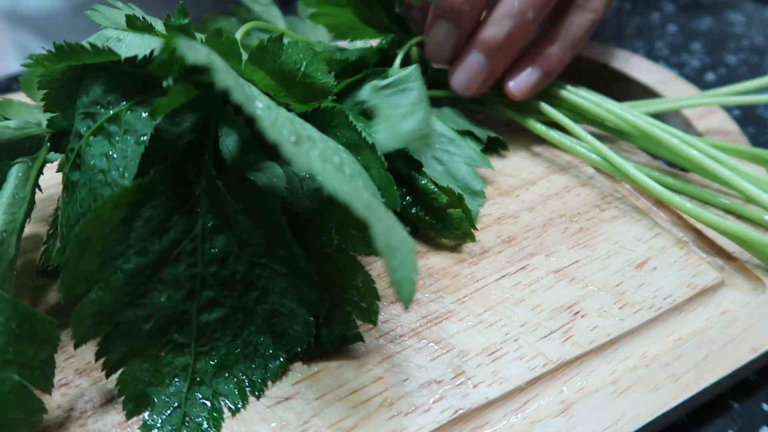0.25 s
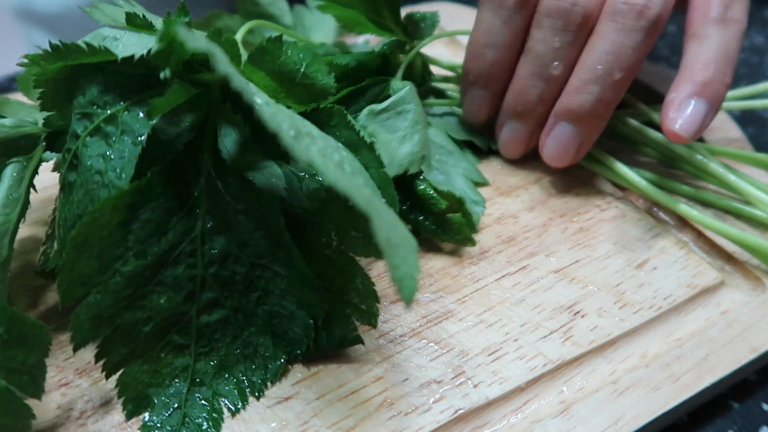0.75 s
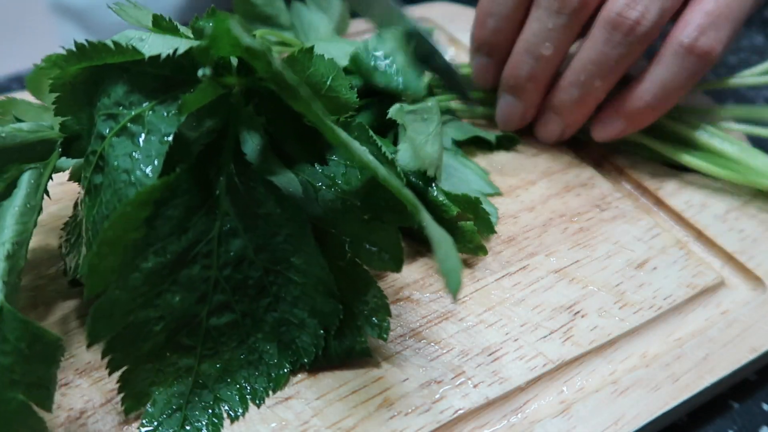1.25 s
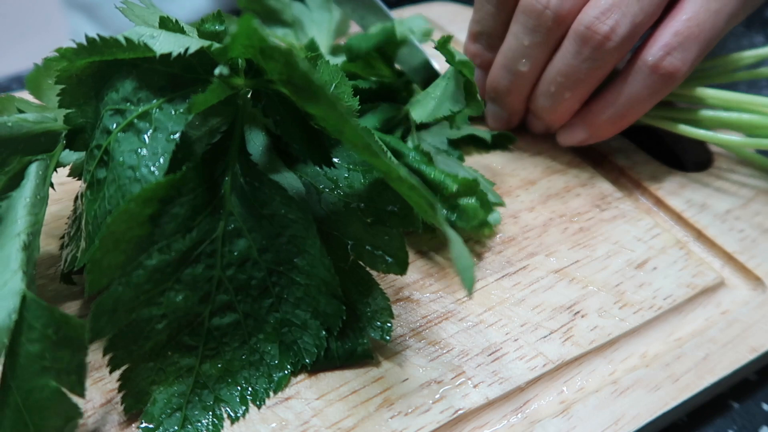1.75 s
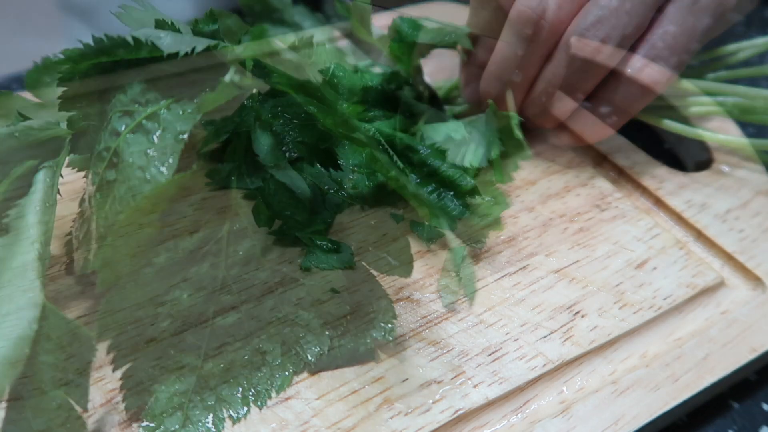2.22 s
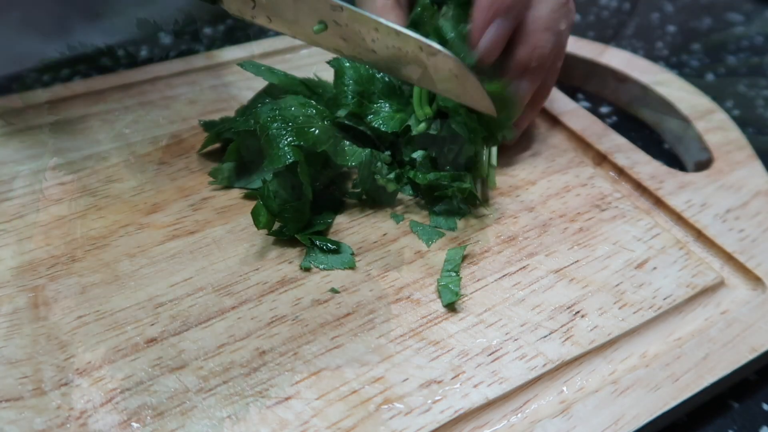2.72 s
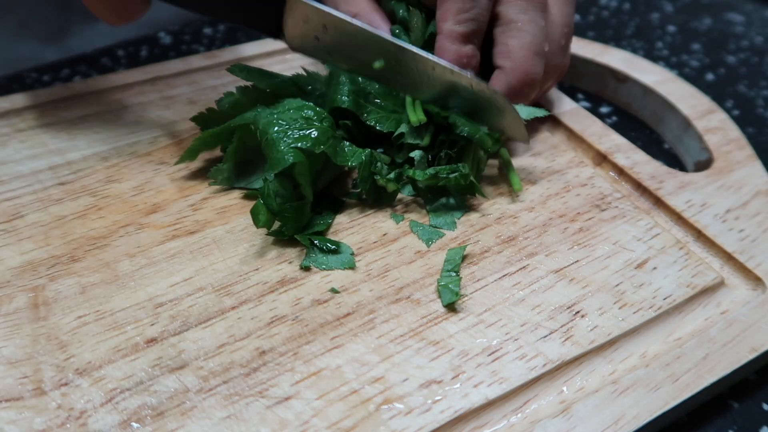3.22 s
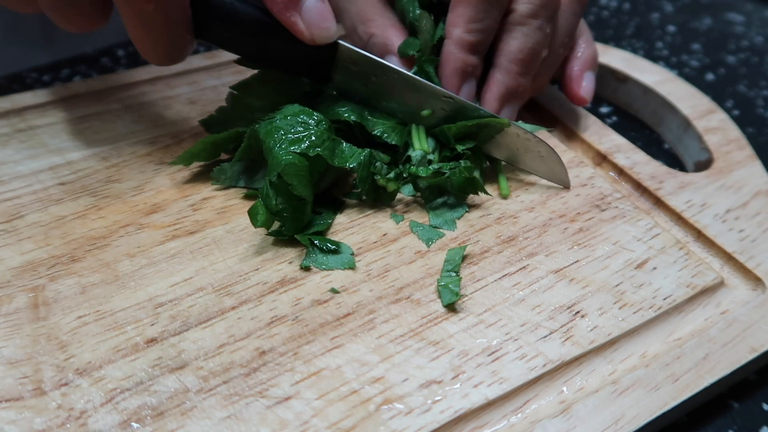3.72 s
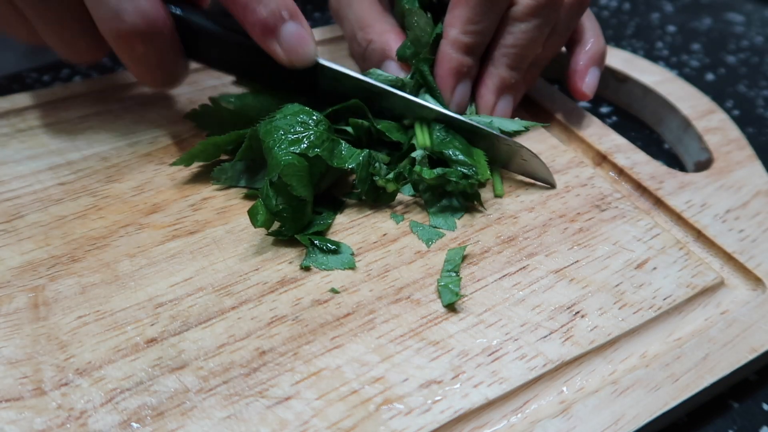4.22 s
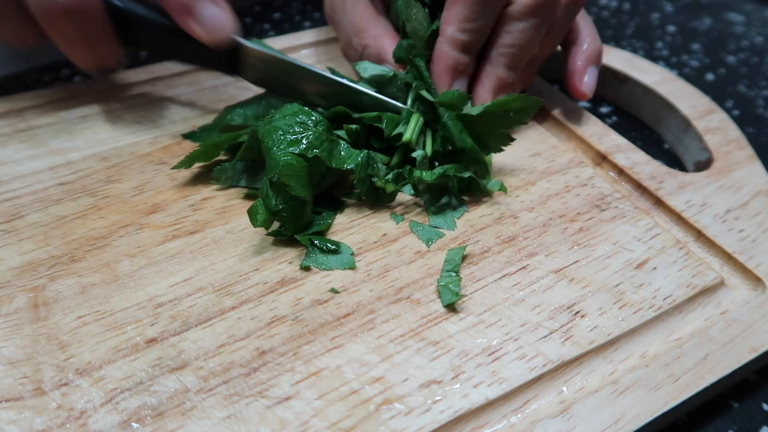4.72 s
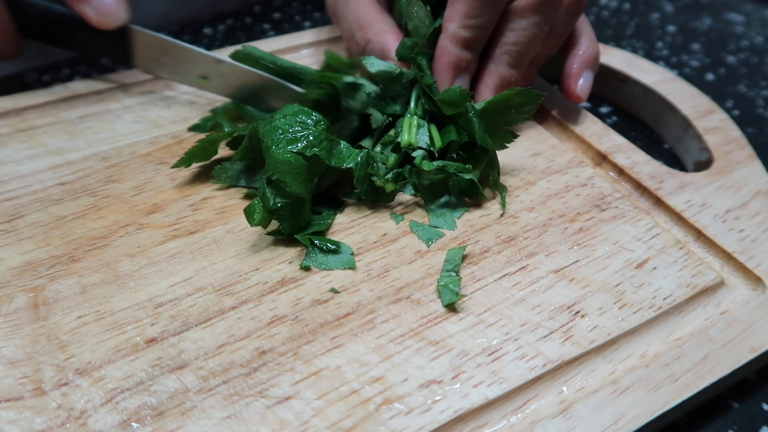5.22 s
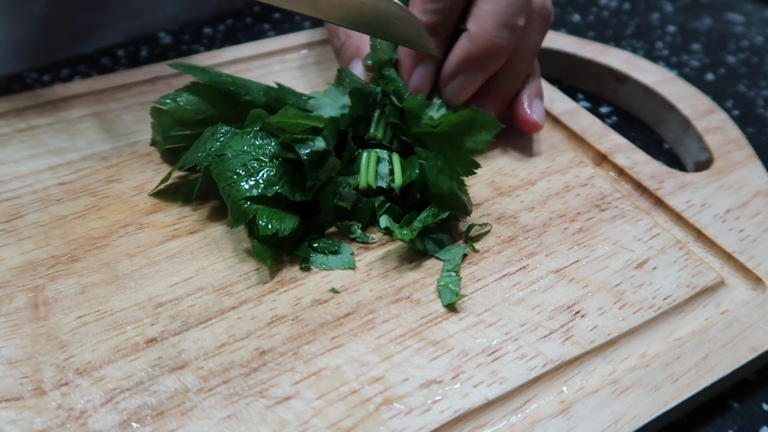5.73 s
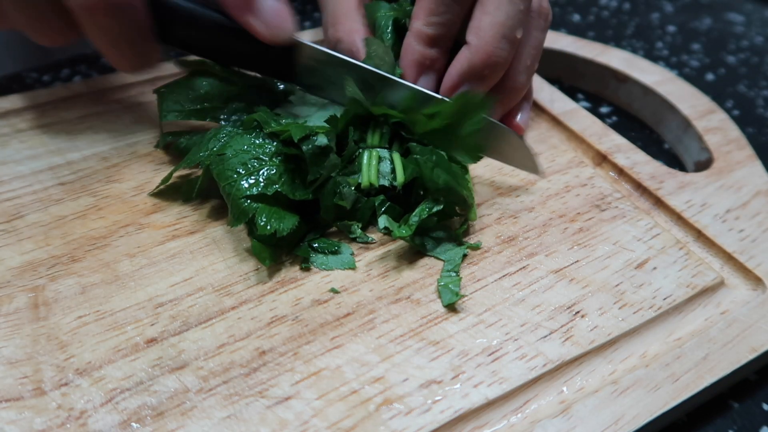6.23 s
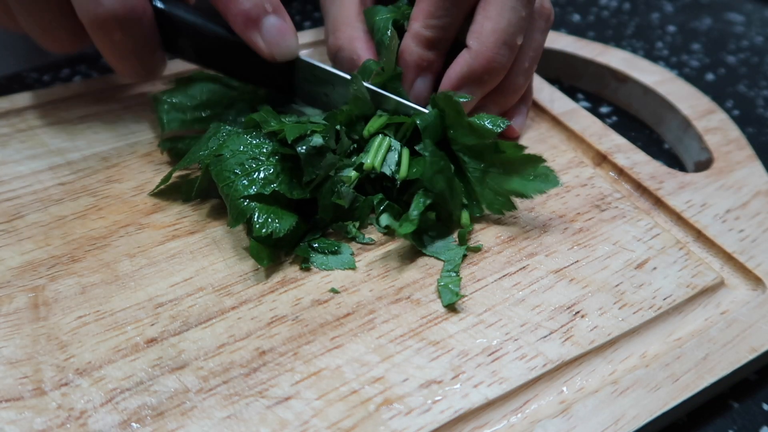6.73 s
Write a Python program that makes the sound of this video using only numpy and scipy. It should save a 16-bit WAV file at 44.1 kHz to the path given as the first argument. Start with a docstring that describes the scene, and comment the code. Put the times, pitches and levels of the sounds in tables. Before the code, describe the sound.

A closely heard knife works through leafy herbs on a wooden cutting board. Quiet handling and faint stalk cracks come first, followed by light taps and scattered snaps. Five quick, juicy crunches then knock the board, the last with the sharpest crack. After a lull of rustling and finger rubs, two more crunchy strokes close the scene. A low, fluctuating hum continues throughout in a fairly dry kitchen.

```python
"""A small knife cuts leafy herbs on a wooden board, close by, in a humming kitchen.
Each stroke is a crunch of dense random fractures, with snapping stalks as short swinging pulses
and knocks as decaying board modes. Leaves rustle under a hand as crackles that swell and fade,
fingers and blade rub over them, and a wet stalk squeaks faintly near the start.
The hum is shaped noise with a mains tone, its level rising and falling; short scatter and
decaying tails give the echoes."""
import sys
import numpy as np
from scipy import signal
from scipy.fft import rfft, irfft, next_fast_len
from scipy.io import wavfile
from scipy.ndimage import uniform_filter1d, map_coordinates

SR = 44100
rng = np.random.default_rng(int(sys.argv[2]) if len(sys.argv) > 2 else 0)


def unload_wav(signal):
    """Save mono or channel-first audio to the path in sys.argv[1] as 16-bit WAV at rate SR, clipped to [-1, 1]."""
    wavfile.write(
        sys.argv[1],
        SR,
        np.round(np.clip(np.atleast_2d(signal).T, -1, 1) * 32767).astype(np.int16),
    )


N = 306936

# Spectra hold relative levels; event levels are those before the gain of their layer.
# level curve of the hum: time_s, level_db
HUM_LEVEL = [(0.0, -48), (0.3, -50), (0.5, -54.5), (0.85, -56.5), (1.27, -52), (1.75, -60.5), (2.0, -52.5),
             (2.48, -62), (3.0, -52.5), (3.5, -51.5), (4.1, -48.5), (4.8, -46), (5.3, -47), (6.15, -50),
             (6.5, -45.5), (6.96, -45)]
# spectrum of the low drone: frequency_hz, density_db (per Hz)
DRONE_SPECTRUM = [(25, -58), (33, -42), (46, -12), (60, -13), (78, -20.5), (98, -2), (125, -4), (160, -4),
                  (200, -3), (245, -4), (285, -19), (350, -18.5), (430, -21), (650, -16), (1100, -120)]
# spectrum of the soft rush of air: frequency_hz, density_db (per Hz)
AIR_SPECTRUM = [(150, -4.5), (330, 7.5), (600, 0), (1250, -2.5), (1600, -11), (2700, -14), (4000, -21.5),
                (8000, -32), (15000, -46)]
# likeness of the hum in the two ears: frequency_hz, correlation (0 to 1)
HUM_LIKENESS = [(130, 1), (220, 0.97), (330, 0.42), (600, 0.64), (1400, 0.46), (3100, 0.0031), (6800, 0)]
# decay of the kitchen's reverberation: frequency_hz, t60_s
KITCHEN_DECAY = [(150, 0.2), (600, 0.29), (2500, 0.048), (6000, 1), (14000, 0.33)]
# left-right difference of the near scatter: frequency_hz, side_db
SCATTER_SPREAD = [(100, -17), (200, -19), (380, -20), (700, -35), (1300, -32), (2400, -13), (4400, -5),
                  (8000, 3), (15000, 0)]
# spectrum of creasing leaves: frequency_hz, density_db (per Hz)
LEAF_SPECTRUM = [(200, -15.5), (550, 13.5), (900, 2.5), (1400, 8.5), (1900, -2.5), (2500, 6), (3300, -1),
                 (4300, -5), (5600, -4.5), (7500, -11), (12500, -12.5), (15500, -23)]
# duller spectrum of settling and rubbed leaves: frequency_hz, density_db (per Hz)
SKIN_SPECTRUM = [(250, -15), (600, 5.5), (1300, 9), (1900, 0.5), (2600, 5.5), (3500, -4), (4400, -8),
                 (5700, -9.5), (8000, -16), (15000, -27.5)]
# spectrum of bursting stalks: frequency_hz, density_db (per Hz)
STALK_SPECTRUM = [(100, -5), (220, 6), (400, 5.5), (580, 4.5), (900, -9), (1350, -0.5), (1950, 1),
                  (2500, 3.5), (3300, -0.5), (4300, -6.5), (5600, -7), (7500, -14.5), (12500, -12.5),
                  (15500, -22)]
# spectrum of a stalk's sharp crack: frequency_hz, density_db (per Hz)
CRACK_SPECTRUM = [(300, -31), (1200, -38), (2500, 22.5), (3500, 5), (6000, 5), (8000, -19.5), (12500, -2.5),
                  (15500, -12)]
# spectrum of the counter under the board: frequency_hz, density_db (per Hz)
COUNTER_SPECTRUM = [(30, -29), (60, -3), (150, -12), (300, -4.5), (450, 1.5), (700, -21), (1500, -66)]
# modes of the board: frequency_hz, level_db, t60_s
BOARD_MODES = [(534, -9, 0.061), (585, 0.5, 0.077), (770, -2, 0.029), (914, -7.5, 0.046),
               (1000, -4.5, 0.02), (1228, -13, 0.083), (1522, -5, 0.036), (1823, -28, 0.05),
               (3030, -33, 0.055)]
# modes of the thin blade, damped by the hand and the leaves: frequency_hz, t60_s, level_db
BLADE_MODES = [(1248, 0.1, -11.5), (1520, 0.006, 6), (1925, 0.03, -9.5), (2405, 0.027, 0.5),
               (2470, .01, 1.5), (2724, 0.016, -8), (3140, 0.0031, 4.5), (3780, 0.0044, 0.5),
               (4980, 0.018, -18.5), (5560, 0.0028, -13)]
# the hand gathers or presses the leaves: fullest_s, rise_s, fall_s, level_db,
# crispness_db (popping relative to the rustle)
HANDLINGS = [(0.01, 0.062, 0.18, -63.5, 5), (1.16, 0.24, 0.2, -70, 3), (2.075, 0.2, 0.25, -52, -4),
             (2.22, 0.13, 0.43, -61, 0.5), (2.95, 0.23, 0.16, -67.5, 2), (3.27, 0.11, 0.42, -68.5, -7),
             (3.66, 0.18, 0.18, -56.5, -9), (3.94, 0.35, 0.15, -58, 1), (5.31, 0.094, 0.52, -59.5, 3.5),
             (5.63, 0.24, 0.27, -77, 10), (6.16, 0.76, 0.83, -63, -6), (6.335, 0.2, 0.068, -49.5, -3),
             (6.455, 0.093, 0.067, -48, 4)]
# fingers slide over the bunch: start_s, length_s, level_db, crackle_pitch_hz
RUBS = [(1.522, 0.033, -66, 2200), (2.467, 0.061, -72, 2740), (2.937, 0.038, -63, 2900),
        (3.563, 0.15, -66, 2500), (5.002, 0.03, -47, 2400), (5.057, 0.075, -52, 2410),
        (5.241, 0.048, -54.5, 2400), (5.275, 0.074, -53.5, 1150), (5.549, 0.16, -56, 2700),
        (5.921, 0.07, -55, 1640), (6.257, 0.067, -55, 3560), (6.302, 0.052, -54, 2720),
        (6.668, 0.059, -48.5, 2300)]
# the blade touches the board lightly: time_s, knock_db, low_thump_db (relative to the knock)
TAPS = [(2.138, -45.5, -16), (3.090, -43.5, -10), (3.718, -46, -14), (4.281, -35, -24), (6.682, -32.5, -16)]
# single stalks and ribs break: start_s, peak_db, pitch_hz, cycles (to the fullest swing), sharpness_db
SNAPS = [(1.151, -43.5, 1700, 1.25, -34), (1.2096, -50, 3300, 1.1, -31), (1.314, -44.5, 2000, 2.2, -34),
         (1.3146, -52, 3530, 2.9, -36), (1.708, -57, 2400, 1.2, -26), (1.839, -46, 2450, 1, -27),
         (1.850, -45, 2000, 0.58, -29), (1.8827, -39.5, 1610, 1.2, -24), (1.8953, -41, 1520, 1.3, -19),
         (1.95, -49, 2000, 1, -16), (2.029, -46, 2780, 0.8, -18), (2.041, -30, 1550, 0.62, -18),
         (2.0625, -39, 1990, .7, -22), (2.0755, -41, 1800, 0.52, -24), (2.0868, -36, 2500, 1, -15),
         (2.103, -34.5, 1700, 0.74, -17), (2.137, -32.5, 1700, 0.95, -22), (2.1478, -36, 1640, 0.99, -27),
         (2.1873, -38.5, 1820, 0.94, -23), (2.238, -44, 1890, 1.6, -28), (2.255, -43, 1900, 0.96, -22),
         (2.29, -40, 1430, 1.16, -18), (2.3265, -42, 2620, 1.03, -9.5), (2.376, -43, 1500, 0.61, -29),
         (2.4673, -40, 1490, 0.86, -20.5), (2.407, -53, 2000, .9, -24), (2.528, -50, 2600, 0.99, -30),
         (2.543, -46.5, 2420, 1, -32), (2.598, -56, 2600, 1, -24), (2.690, -57, 2600, 0.87, -24),
         (2.8892, -34, 2470, 2.25, -27), (2.9837, -33.5, 2000, 0.94, -17.5), (3.475, -51, 2600, 1.1, -16),
         (3.503, -45, 2600, 1, -20), (3.5877, -38, 2000, 0.7, -17.5), (3.6, -43, 2400, 1.4, -24),
         (3.617, -48, 2400, 0.63, -11), (3.713, -42.5, 2200, 0.78, -24), (3.6642, -40.5, 1200, 1.2, -15),
         (3.7448, -34.5, 3200, 0.75, -23), (3.7984, -39, 2530, 1.4, -14), (3.828, -45, 2500, 0.67, -20),
         (3.854, -43, 1460, 1.3, -26), (3.950, -34.5, 2450, 1, -23), (4.0166, -27.5, 2550, 1.2, -20),
         (4.045, -31.5, 1390, 1.1, -9.5), (4.089, -27.5, 1400, 0.6, -17.5), (4.175, -33, 2450, 1.4, -13),
         (4.2392, -31, 1750, .9, -17), (4.247, -27, 1740, 1.14, -27), (4.2544, -24, 1790, 0.9, -20),
         (4.2628, -27, 2350, 1.5, -13), (4.2733, -25, 1460, 1.04, -15.5), (4.2872, -34, 1480, 0.61, -17),
         (4.4734, -35, 2600, 0.97, -25), (4.4811, -19.5, 1440, 1.5, -14.5), (4.4934, -29, 1280, 2.1, -24),
         (4.5046, -21.5, 2550, 1.9, -16), (4.5095, -28, 1540, 1.7, -16), (4.585, -36, 2600, 1.1, -20),
         (4.640, -35.5, 1400, 1.2, -25), (4.692, -35, 2300, .8, -21), (4.6977, -34, 1280, 1.1, -13),
         (4.7134, -26, 1280, 1.1, -25), (4.7207, -27, 1430, 1.72, -6.5), (4.82, -21, 1360, 0.9, -22),
         (4.8658, -17, 2680, 0.77, -23), (4.871, -24, 2000, 0.87, -19), (4.8825, -20.5, 1470, 1.05, -24),
         (4.9075, -11.5, 1390, 1.16, -31), (4.9306, -22, 1310, 1.7, -17), (4.938, -29, 1250, 2, -22),
         (4.951, -20, 2460, 1.1, -14), (5.039, -22, 2300, 1.7, -21), (5.0469, -20, 2510, 1.05, -27),
         (5.358, -32, 2490, 0.55, -10), (5.470, -32, 2900, 0.91, -19), (5.793, -44.5, 2900, 1.5, -22),
         (6.2633, -32.5, 3740, 1.2, -25), (6.3585, -34, 2500, 1.1, -13), (6.388, -40, 2200, 0.62, -18),
         (6.498, -40, 1800, 1.1, -24), (6.5396, -31, 2200, 1.3, -12), (6.554, -21.5, 1680, 0.94, -15),
         (6.569, -28, 1000, 0.68, -21), (6.5947, -22, 2220, 1.03, -21), (6.76, -30, 3080, 0.92, -9.5),
         (6.7738, -15, 2850, 1.12, -30), (6.7762, -20, 2880, 0.98, -26), (6.781, -33, 1090, 0.76, -24),
         (6.7995, -20.5, 2330, 1.9, -20), (6.8018, -22, 1100, 0.8, -21), (6.864, -32, 2840, 0.59, -12),
         (6.881, -36, 1100, 0.56, -13), (6.9152, -29, 2410, 1.4, -22), (6.9209, -30, 1160, 1.3, -8.5),
         (6.9361, -29, 1900, 1.23, -23)]
# light cuts that stop short of the board: start_s, length_s, level_db, fizz_db (relative to the level)
NICKS = [(1.878, 0.016, -54.5, -2.5), (2, 0.0076, -52, 1), (2.057, 0.034, -58, 5.5),
         (2.182, 0.014, -55.5, 1.5), (2.32, 0.0043, -55.5, 1), (3.926, 0.042, -54.5, 0.5),
         (4.163, 0.0056, -45.5, 1.5), (4.864, 0.016, -44, -2), (5.037, 0.0052, -38.5, 1),
         (6.324, 0.041, -52, 7.5), (6.914, 0.0081, -45.5, 6.5)]
# full strokes: landing_s, cutting_before_s, cutting_after_s, crunch_db, crunch_pitch_hz,
# fizz_db (relative to the crunch), knock_db, low_thump_db (relative to the knock), drag_out_db
CHOPS = [(4.046, 0.013, 0.018, -43, 1500, 2, -22, -33, -49),
         (4.262, 0.016, 0.035, -42, 1840, 2.5, -32.5, -25, -49),
         (4.507, 0.026, 0.008, -40.5, 1670, 2.5, -36, -11, -50),
         (4.722, 0.024, 0.0032, -39.5, 1290, 1.5, -35.5, 6.5, -44.5),
         (4.936, 0.029, 0.0081, -35.5, 1300, 0, -28, -6, -48),
         (6.554, 0.0051, 0.011, -38, 1200, 3.5, -21.5, -15, -49.5),
         (6.802, 0.032, 0.012, -37.5, 2900, 2.5, -30, -27, -46)]

TOP_HZ = 15900  # band limit of the recorder
RUSTLE_RANGE_DB = 23  # a rustle grows by this much over its rise and loses it over its fall
# each stroke stirs the loose leaves, at a level relative to its crunch
STIR_DB, STIR_RISE_S, STIR_FALL_S = -11, 0.058, 0.27
# after each landing the blade drags back out of the bunch; the delay runs to the middle of the drag
DRAG_DELAY_S, DRAG_LENGTH_S = 0.12, 0.11
# the edge first parts the loose top leaves: how much earlier, and level relative to the crunch
BITE_S, BITE_DB = 0.017, -10.5
NICK_HZ = 2390  # central pitch of the veins in a light cut
# shaking passed to the board: through the leaves, extra near the landing, decay time of that nearness
BOARD_FAR_DB, BOARD_NEAR_DB, BOARD_NEAR_S = -2.5, -16.5, 0.074
# fibres give way around each main break: lead, span, level, and spread of pitch (log frequency)
SPLINTER_LEAD_S, SPLINTER_SPAN_S, SPLINTER_DB, SPLINTER_SPREAD = 0.002, 0.008, -11, 0.35


def amp(db):
    """Level law: decibels to amplitude gain."""
    return 10 ** (np.asarray(db) / 20)


def unit(x):
    """Power normalisation: x at rms 1."""
    return x / np.sqrt(np.mean(x ** 2) + 1e-20)


def along(points, hz):
    """Interpolation of (frequency, value) points on a logarithmic frequency axis."""
    f, v = np.transpose(points)
    return np.interp(np.log(hz + 1), np.log(f + 1), v)


def add(track, s, sound):
    """Superposition: mix a sound into the track at time s."""
    part = track[max(round(s * SR), 0):][:len(sound)]
    part += sound[:len(part)]


def filtered(x, response):
    """Linear filtering: the spectrum of x times a response of frequency."""
    m = next_fast_len(N + SR // 2)
    return irfft(rfft(x, m) * response(np.fft.rfftfreq(m, 1 / SR)), m)[..., :N]


def through(x, impulse):
    """Convolution: x passed through an impulse response."""
    return signal.fftconvolve(x, impulse)[:N]


def click(spectrum, size=2048):
    """Minimum phase: the causal impulse of energy 1 with this spectrum, by folding its cepstrum."""
    cepstrum = irfft(np.log(amp(along(spectrum, np.fft.rfftfreq(size, 1 / SR)))))
    cepstrum[1:size // 2] *= 2
    cepstrum[size // 2 + 1:] = 0
    pulse = irfft(np.exp(rfft(cepstrum)))
    return pulse / np.linalg.norm(pulse)


def wobble(rate):
    """Slow random modulation: a smooth curve through random knots, rate knots a second."""
    knots = rng.standard_normal(int(N * rate / SR) + 4)
    return map_coordinates(knots, [np.arange(N) * rate / SR])


def rush(spectrum):
    """Diffuse field: stereo noise of rms 1, alike in both ears in the bass."""
    def mid_side(hz):
        angle = np.arccos(np.clip(along(HUM_LIKENESS, hz), -1, 1)) / 2
        return amp(along(spectrum, hz)) * [np.cos(angle), np.sin(angle)]

    mid, side = filtered(rng.standard_normal((2, N)), mid_side)
    return unit(np.array([mid + side, mid - side]))


def hum(drone_db=0.0, air_db=-5, air_growth=0.95, mains_hz=120, mains_db=-9, waver_db=0.7):
    """Shaped noise: drone, mains tone and rush of air, likely of a fan, on one rising and falling level curve."""
    t = np.arange(N) / SR
    level = np.interp(t, *np.transpose(HUM_LEVEL))
    change = level - level.mean() + waver_db * wobble(13.0)
    mains = np.sqrt(2) * np.sin(2 * np.pi * mains_hz * t)
    drone = amp(change + drone_db) * (rush(DRONE_SPECTRUM) + amp(mains_db) * mains)
    air = amp(air_growth * change + air_db) * rush(AIR_SPECTRUM)
    return amp(level.mean()) * (drone + air)


def kitchen(x):
    """Reverberation: the walls answer, and each frequency dies at its own speed."""
    hz, t, z = signal.stft(rng.standard_normal((2, SR // 2)), SR, nperseg=256)
    decay = amp(-60 * t / along(KITCHEN_DECAY, hz)[:, None])
    tails = signal.istft(z * decay, SR, nperseg=256)[1]
    return np.array([through(x, tail / np.linalg.norm(tail)) for tail in tails])


def near_echoes(x, t60=0.0062, side_db=-1, count=4):
    """Scattering: breaks at shifting spots reach the ears differently off the counter, most in the treble."""
    t = np.arange(SR // 20) / SR
    scatters = rng.standard_normal((count, len(t))) * amp(-60 * t / t60)
    spots = np.array([wobble(60) for _ in scatters])
    spots /= np.linalg.norm(spots, axis=0)
    scattered = sum(through(x * spot, scatter / np.linalg.norm(scatter))
                    for spot, scatter in zip(spots, scatters))
    side = filtered(scattered, lambda hz: amp(along(SCATTER_SPREAD, hz) + side_db))
    return np.array([x + side, x - side])


def squeak(start=0.028, length=0.079, from_hz=1120, to_hz=1085, db=-52, waver=0.014):
    """Frictional tone: a wet stalk squeaks faintly as it slips, its pitch gliding and wavering."""
    size, track = round(length * SR), np.zeros(N)
    hz = np.linspace(from_hz, to_hz, size) * (1 + waver * wobble(150)[:size])
    tone = np.sin(2 * np.pi * np.cumsum(hz) / SR)
    add(track, start, amp(db) * np.sin(np.linspace(0, np.pi, size)) * tone)
    return track


def fractures(rate, scatter_db, clump_db, clump_rate=170):
    """Random fracture: tiny breaks in clumps, a few larger than the rest; rms 1."""
    breaks = rng.random(N) < rate / SR
    scatter = scatter_db * np.clip(rng.standard_normal(N), -2, 2)
    clumps = clump_db * np.clip(wobble(clump_rate), -2, 2)
    return unit(breaks * amp(scatter + clumps) * rng.choice([-1, 1], N))


def swing(hz, cycles, size=384):
    """Damped oscillation: a broken fibre swings to its fullest and dies away; peak about 1."""
    turns = hz * np.arange(size) / SR
    u = turns / cycles
    return (u * np.exp(1 - u)) ** 2 * np.sin(2 * np.pi * turns)


def veins(size, hz, rate, spread=0.29, scatter_db=5.5, cycles=1.6):
    """Granular fracture: thin veins break at random moments, each at its own pitch around hz; rms 1."""
    at = np.flatnonzero(rng.random(size) < rate / SR)[:, None]
    tone, strength = np.clip(rng.standard_normal((2, size)), -2, 2)[:, at]
    grains = amp(scatter_db * strength) * swing(hz * np.exp(spread * tone), cycles)
    positions = at + np.arange(grains.shape[1])
    return unit(np.bincount(positions.ravel(), grains.ravel(), size)[:size])


def modal_ring(modes, vary_db, t):
    """Modal synthesis: decaying sines of alternating sign, mixed anew for each excitation."""
    ring = np.zeros(len(t))
    for k, (hz, db, t60) in enumerate(modes):
        decay = amp(db + vary_db * rng.standard_normal() - 60 * t / t60)
        ring += (-1) ** k * decay * np.sin(2 * np.pi * hz * t)
    return ring


def board_ring(vary_db=2, attack=0.00034):
    """Modes of a plate: the board's modes take new strengths for each spot that is struck."""
    t = np.arange(SR // 4) / SR
    return modal_ring(BOARD_MODES, vary_db, t) * (1 - np.exp(-t / attack))


def blade_ring(vary_db=-1.0):
    """Damped modes: a break on the edge rings the blade briefly, in a new mix each time; energy 1."""
    t = np.arange(SR // 40) / SR
    ring = modal_ring([(hz, db, t60) for hz, t60, db in BLADE_MODES], vary_db, t)
    return ring / np.linalg.norm(ring)


def pops(rate, scatter_db=4, count=8):
    """Impulsive excitation: fibres break at random at several places along the edge; rms 1."""
    return unit(sum(through(fractures(rate / count, scatter_db, clump_db=3.5), blade_ring())
                    for _ in range(count)))


def rustle_swell(rows):
    """Exponential rise and fall about each fullest moment; the powers of the rustles add."""
    t = np.arange(N) / SR
    power = np.zeros(N)
    for s, rise, fall, db in rows:
        power += amp(db - RUSTLE_RANGE_DB * np.maximum((s - t) / rise, (t - s) / fall)) ** 2
    return np.sqrt(power)


def leaves(level_db=-0.74, pop_db=-6.5, vein_db=-2, stir_db=0.0):
    """Crackling noise: leaves crease brightly under the hand, settle dully about strokes, and pop if crisp."""
    hand = rustle_swell([row[:-1] for row in HANDLINGS])
    crisp = rustle_swell([(s, rise, fall, db + crisp_db) for s, rise, fall, db, crisp_db in HANDLINGS])
    stir = rustle_swell([(s, STIR_RISE_S, STIR_FALL_S, crunch_db + STIR_DB)
                         for s, _, _, crunch_db, *_ in CHOPS])
    creasing = through(fractures(rate=2600, scatter_db=0.5, clump_db=3.0), click(LEAF_SPECTRUM))
    settling = through(fractures(rate=4100, scatter_db=4.0, clump_db=-2.0), click(SKIN_SPECTRUM))
    ticks = amp(pop_db) * pops(rate=300, scatter_db=3.3)
    ticks += amp(vein_db) * veins(N, 1920, rate=190, scatter_db=3.5, cycles=0.83)
    return amp(level_db) * (hand * creasing + amp(stir_db) * stir * settling + np.hypot(crisp, stir) * ticks)


def rubs(level_db=-2.0, pop_db=-5, vein_db=-1, hiss_db=-7, board_db=-10):
    """Sliding friction: fingers or blade crackle on wet leaves; the blade also ticks, hisses, stirs the board."""
    fingers, creasing, blade = np.zeros((3, N))

    def arch(length):
        return np.sin(np.linspace(0, np.pi, round(length * SR)))

    for s, length, db, hz in RUBS:
        pressure = amp(db) * arch(length)
        add(fingers, s, pressure)
        add(creasing, s, pressure * veins(SR // 2, hz, rate=2200, spread=0.19)[:len(pressure)])
    for s, *_, drag_db in CHOPS:
        add(blade, s + DRAG_DELAY_S - DRAG_LENGTH_S / 2, amp(drag_db) * arch(DRAG_LENGTH_S))
    crackle = through(fractures(rate=6200, scatter_db=1.5, clump_db=2.0), click(SKIN_SPECTRUM))
    hiss = through(fractures(rate=6000, scatter_db=0.5, clump_db=5), click(STALK_SPECTRUM))
    wood = unit(through(rng.standard_normal(N), board_ring()))
    steel = amp(pop_db) * pops(rate=520) + amp(hiss_db) * hiss + amp(board_db) * wood
    return amp(level_db) * ((fingers + blade) * crackle + amp(vein_db) * creasing + blade * steel)


def knocks(level_db=0, thump_hz=185, thump_t60=0.13, thump_db=-5, thud_db=-20, thud_t60=0.19):
    """Impact: the edge rings the board and pushes it against the counter, which answers with a dull thud."""
    track, push = np.zeros((2, N))
    for s, db, low_db in TAPS + [(s, knock_db, low_db) for s, *_, knock_db, low_db, _ in CHOPS]:
        ring = board_ring()
        t = np.arange(len(ring)) / SR
        thump = amp(low_db + thump_db - 60 * t / thump_t60) * np.sin(2 * np.pi * thump_hz * t)
        add(track, s, amp(db + level_db) * (ring / np.abs(ring).max() + thump))
        add(push, s, amp(db + thud_db - 60 * t / thud_t60) * (1 + amp(low_db)))
    return track + through(push * rng.standard_normal(N), click(COUNTER_SPECTRUM))


def snaps(crack_db=9.0, crack_t60=0.0053, level_db=-4.0, ring_db=-16, tear_db=-17, tear_t60=0.052, count=4):
    """Brittle fracture: a stalk cracks, swings and rings the blade; splinters join and last fibres tear."""
    track, crack = np.zeros(N), click(CRACK_SPECTRUM)
    t = np.arange(len(crack)) / SR

    def burst(t60):
        return rng.standard_normal(len(t)) * amp(-60 * t / t60)

    for s, db, hz, cycles, sharp_db in SNAPS:
        fibres, ring = burst(crack_t60), blade_ring()
        split = signal.fftconvolve(crack / np.abs(crack).max(), fibres / np.linalg.norm(fibres))
        tear = signal.fftconvolve(ring, burst(tear_t60))
        fullest = s + cycles / hz
        add(track, s, amp(db + level_db) * swing(hz, cycles, size=len(t)))
        add(track, s, amp(db + sharp_db + crack_db) * split)
        add(track, fullest, amp(db + ring_db) * ring / np.abs(ring).max())
        add(track, fullest, amp(db + tear_db) * tear / np.abs(tear).max())
        for k, (when, tone, strength) in enumerate(rng.random((count, 3))):
            splinter = swing(hz * np.exp(SPLINTER_SPREAD * (4 * tone - 1.5)), cycles=0.5)
            start = s - SPLINTER_LEAD_S + SPLINTER_SPAN_S * (k + when) / count
            add(track, start, amp(db + level_db + SPLINTER_DB) * (0.5 + strength) * splinter)
    return track


def crunch(length, db, rise=0.0005, release=0.016):
    """Force envelope of one cut: it sets in at once, holds and dies away."""
    t = np.arange(SR // 4) / SR
    return amp(db) * (1 - np.exp(-t / rise)) * np.exp(-np.maximum(t - length, 0) / release)


def stalk_surges(t, count=64, gap_s=0.008, sag_db=9):
    """Successive yielding: the crunch surges as the edge meets each stalk, then sags; rms 1."""
    meets = np.concatenate([[0], np.cumsum(gap_s * rng.uniform(0.5, 1.5, count))])
    since_meeting = np.interp(t, meets, np.arange(count + 1)) % 1
    return unit(amp(-sag_db * since_meeting))


def cuts(level_db=-3.5, pop_db=-5, vein_db=-1.5, board_gain_db=2.5):
    """Dense fracture: cells burst and veins snap as the blade moves; nearer the board, it shakes the wood more."""
    t = np.arange(SR // 4) / SR
    effort, juice, snapping, wood = np.zeros((4, N))
    strokes = [(s - before, before + after, db, fizz_db, hz, np.exp(-np.abs(t - before) / BOARD_NEAR_S))
               for s, before, after, db, hz, fizz_db, *_ in CHOPS]
    bites = [(s - BITE_S, BITE_S / 2, db + BITE_DB, fizz_db, hz, 0) for s, _, db, fizz_db, hz, _ in strokes]
    nicks = [(*nick, NICK_HZ, 0) for nick in NICKS]
    for s, length, db, fizz_db, hz, nearness in strokes + bites + nicks:
        stroke = crunch(length, db + level_db) * stalk_surges(t)
        add(effort, s, stroke)
        add(juice, s, amp(fizz_db) * stroke)
        add(snapping, s, stroke * veins(len(t), hz, rate=390, scatter_db=4.5, cycles=1.0))
        ring = board_ring()
        coupling = amp(board_gain_db) * (amp(BOARD_FAR_DB) + amp(BOARD_NEAR_DB) * nearness)
        shaking = coupling * stroke * rng.standard_normal(len(t))
        add(wood, s, signal.fftconvolve(shaking, ring / np.linalg.norm(ring)))
    fizz = through(fractures(rate=5000, scatter_db=0.0, clump_db=1.5), click(STALK_SPECTRUM))
    return juice * fizz + amp(pop_db) * effort * pops(rate=290) + amp(vein_db) * snapping + wood


def shifting(x, depth_db=2.0, size=512):
    """Time-varying spectrum: the crackle's colour shifts at random as the edge meets other stalks and leaves."""
    z = signal.stft(x, nperseg=size)[2]
    across_hz = uniform_filter1d(rng.standard_normal(z.shape), size=4, axis=0)
    field = unit(uniform_filter1d(across_hz, size=7, axis=1))
    gain = unit(amp(depth_db * np.clip(field, -2, 2)))
    return signal.istft(z * gain, nperseg=size)[1][:N]


def scene():
    """Superposition of the work on the board, its echoes and the hum."""
    work = shifting(leaves() + rubs() + cuts()) + squeak() + snaps() + knocks()
    return near_echoes(work) + amp(-12.5) * kitchen(work) + hum()


def record(dry, low_cut_hz=32):
    """Band limiting: the recorder rolls off the lowest bass and keeps nothing above its band limit."""
    return filtered(dry, lambda hz: (hz < TOP_HZ) * (1 - 1 / (1 + (hz / low_cut_hz) ** 10)))


dry = scene()
out = record(dry)
unload_wav(out)
```